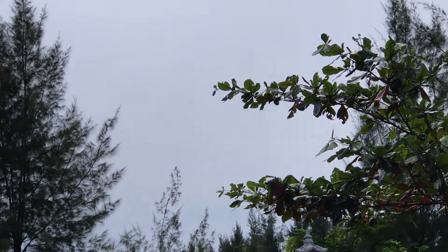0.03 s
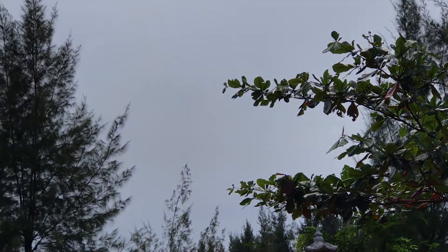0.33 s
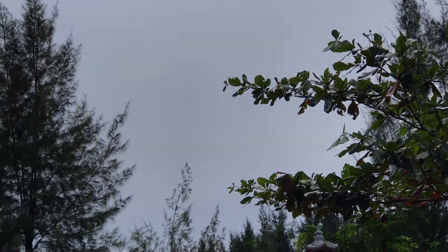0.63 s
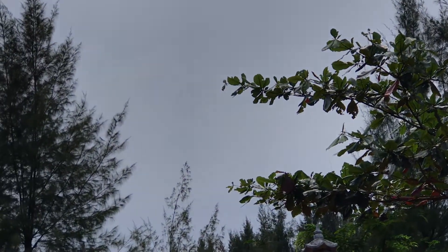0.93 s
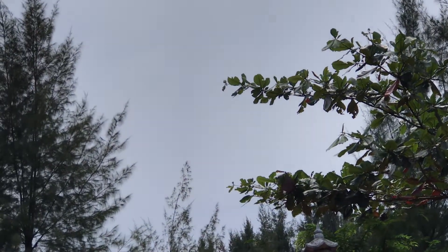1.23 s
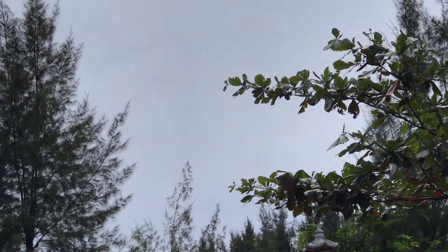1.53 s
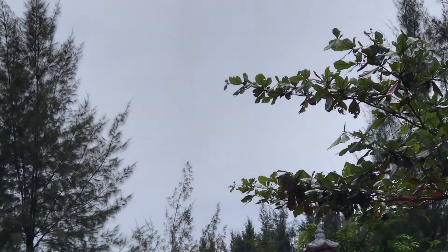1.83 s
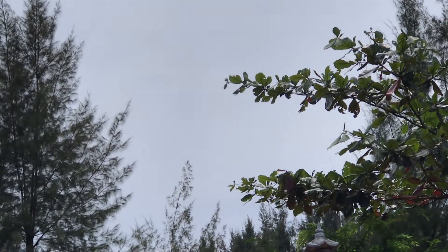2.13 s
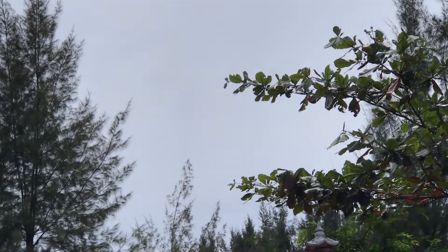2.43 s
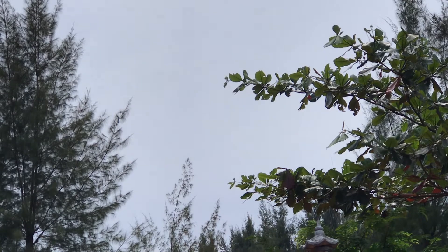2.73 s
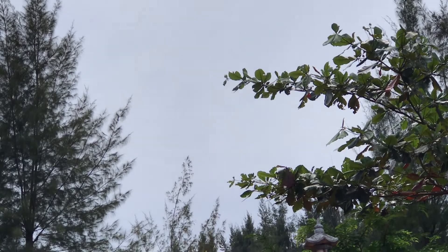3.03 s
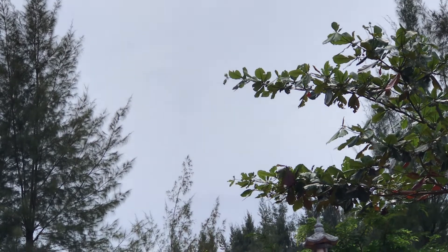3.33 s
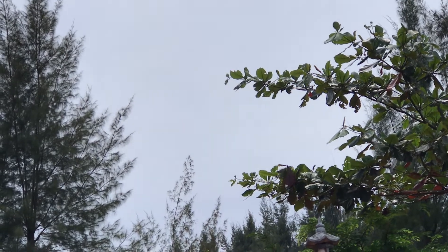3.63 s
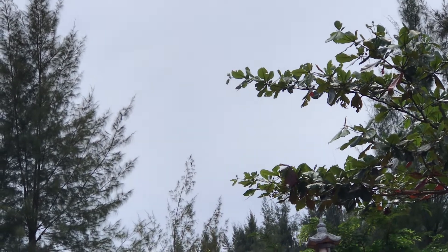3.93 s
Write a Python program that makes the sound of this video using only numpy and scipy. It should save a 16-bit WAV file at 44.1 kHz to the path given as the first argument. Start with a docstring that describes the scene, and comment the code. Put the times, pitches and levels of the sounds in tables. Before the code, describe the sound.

Short rising bird calls come in a few bursts outdoors, over low background noise.

```python
"""An unseen bird calls among trees, over a low distant rumble and a thin insect drone that last throughout.
First comes a rising whistle that ends in a flick, with quick scooped chirps and faint far-off birds.
A dry tick and a few rustles follow, then two more whistles, one harsh rasp near 2.8 s, a rustle and chirps;
far birds close the scene. Whistles and chirps are gliding tones with overtones; the rasp is hiss with
throat resonances. The trees scatter each call into a short tail."""
import sys
import numpy as np
from scipy import signal
from scipy.fft import rfft, irfft
from scipy.io import wavfile

SR = 44100
rng = np.random.default_rng(int(sys.argv[2]) if len(sys.argv) > 2 else 0)


def to_wav(s):
    """Save 16-bit WAV."""
    ch = np.atleast_2d(s).T  # columns
    pcm = np.round(np.clip(ch, -1, 1) * 32767)  # PCM
    wavfile.write(sys.argv[1], SR, pcm.astype(np.int16))


N = 176400
LEAD_S = .25  # tracks begin early, so the tail of an earlier call carries into the scene


def amp(db):
    """Amplitude ratio of a level in decibels."""
    return 10 ** (np.asarray(db) / 20)


def unit(x):
    """Normalisation to rms 1."""
    return x / np.sqrt(np.mean(x ** 2) + 1e-20)


def read(points, hz):
    """Interpolation of a table on a log-frequency axis."""
    f, value = np.transpose(points)
    return np.interp(np.log(hz + 1), np.log(f + 1), value)


def noise(size, shape):
    """Spectral shaping: white noise weighted by the gain shape(Hz), at rms 1."""
    spectrum = rfft(rng.standard_normal(size))
    return unit(irfft(spectrum * shape(np.fft.rfftfreq(size, 1 / SR)), size))


def band(size, hz, width):
    """Narrow-band noise with a Gaussian spectrum."""
    return noise(size, lambda f: np.exp(-.5 * ((f - hz) / width) ** 2))


def wander(size, rate_hz):
    """Low-pass noise: a smooth random modulator."""
    return noise(max(size, SR), lambda f: np.exp(-(f / rate_hz) ** 2))[:size]


def edges(t, length, edge_s):
    """Raised-cosine onset and release of a note."""
    return np.sin(np.pi / 2 * np.clip(np.minimum(t, length - t) / edge_s, 0, 1)) ** 2


def phase_of(hz):
    """Phase as the time integral of frequency."""
    return 2 * np.pi * np.cumsum(hz) / SR


def flutter(phase, radians):
    """Random phase modulation broadens a partial's spectral line."""
    return np.sin(phase + radians * wander(len(phase), 500))


def background():
    """Superposed noise: broadband rumble and air, narrow bands of distant machine hum and insects."""
    # spectrum of the rumble and air: (frequency [Hz], relative spectral level [dB])
    air_spectrum = [(12, -31), (24, -38), (40, -5), (77, -4), (130, -5), (190, -11), (300, -21), (500, -27),
                    (800, -28.5), (1700, -31.5), (2800, -36.5), (4200, -41.5), (5500, -43.5), (7730, -50),
                    (9500, -44), (16000, -51)]
    # steady bands of machines and of insects: (centre [Hz], width [Hz], level [dB])
    hums = [(73.1, 4.9, -55), (169.4, 7.5, -64), (354.3, 5.1, -74.5)]
    insects = [(6628, 240, -72), (9150, 420, -81), (13450, 150, -84), (15530, 120, -81)]
    air = noise(N, lambda f: amp(read(air_spectrum, f)))
    air *= amp(-51.5 + .88 * wander(N, rate_hz=2))  # slight gusts
    return air + sum(amp(db) * band(N, hz, width) for hz, width, db in hums + insects)


def whistles():
    """Harmonic glides: a soft climbing tone swells, then flicks upward as its overtones strengthen."""
    # notes: (start [s], length [s], peak level [dB], opening re peak [dB],
    # swell time [share of length], pitch [ratio], overtone boost [dB])
    notes = [(-.19, 0.11, -37, -8, 0.43, 1.056, 2), (.108, 0.11, -37, -11, 0.48, 1.026, 3),
             (1.585, .128, -37, -18, 0.52, .995, 0.5), (1.855, .118, -36, -18, 0.52, 1.02, 5.5)]
    # pitch contour: (time [share of length], frequency before the note's ratio [Hz])
    glide = [(0, 2775), (.14, 2950), (.3, 3230), (.58, 3366), (.72, 3545), (.84, 3917), (.91, 4076),
             (1, 4470)]
    # overtones: (harmonic [number], relative level in the flick [dB], before the flick [dB])
    overtones = [(2, -40.5, -48), (3, -19.5, -32.5), (4, -13, -29)]
    opening_db_per_s, swell_s = 68, .0024
    flick_at, flick_rise_s = .76, .0026  # share of the length where the voice hardens, and how fast
    for start, length, db, soft_db, swell_at, ratio, bright_db in notes:
        t = np.arange(0, length, 1 / SR)
        hz = ratio * np.interp(t / length, *np.transpose(glide))
        phase = phase_of(hz * (1 + .0087 * wander(len(t), 300)))
        flick = 1 / (1 + np.exp((flick_at * length - t) / flick_rise_s))
        upper = sum(amp(bright_db + before + (during - before) * flick) * flutter(round(k) * phase, 1)
                    for k, during, before in overtones)
        opening_db = soft_db + opening_db_per_s * (t - swell_at * length / 2)
        held_db = opening_db / (1 + np.exp((t - swell_at * length) / swell_s))  # goes to 0 at the swell
        voice = amp(held_db + 2 * (flick - 1)) * np.sin(phase) + amp(.93 * held_db) * upper
        yield start, np.sqrt(2) * amp(db) * edges(t, length, .0063) * voice


def far_calls():
    """Linear frequency sweeps: the faint pure tones of other birds far off."""
    # calls: (start [s], length [s], first pitch [Hz], last pitch [Hz], level [dB])
    calls = [(0.014, 0.038, 5700, 5150, -69), (.355, .045, 6000, 5100, -70),
             (3.966, 0.051, 1560, 2020, -58), (3.905, .06, 14900, 15400, -75)]
    for start, length, from_hz, to_hz, db in calls:
        t = np.arange(0, length, 1 / SR)
        phase = phase_of(from_hz + (to_hz - from_hz) * t / length)
        yield start, np.sqrt(2) * amp(db) * edges(t, length, .0081) * np.sin(phase)


def chirps():
    """Frequency modulation: the pitch drops, then sweeps up; random jitter makes it rough."""
    # notes: (start [s], length [s], first pitch [Hz], dip [Hz], last pitch [Hz], mid-note level [dB],
    # growth over the note [dB], roughness [0-1], second harmonic re fundamental [dB])
    notes = [(0.116, .035, 4220, 3250, 4560, -44.5, -2, 0.1, -29),
             (.152, .02, 3690, 2780, 3560, -48, 16, 0.3, -20),
             (.394, .037, 4230, 3200, 4630, -47.5, -11, 0, -40),
             (0.43, 0.015, 3330, 2843, 3780, -49.5, 17, 0.4, -34),
             (3.21, 0.039, 4200, 3300, 4475, -46, 9, 0.13, -18),
             (3.247, 0.0129, 4210, 2920, 3120, -51.5, -3, .9, -1.5),
             (3.254, .025, 3490, 3760, 4780, -44, 12, 0.06, -25)]
    dip_at, scoop_bend, jitter = .261, 1.45, .12
    for start, length, first_hz, dip_hz, last_hz, db, growth_db, rough, overtone_db in notes:
        t = np.arange(0, length, 1 / SR)
        progress = t / length
        fall = np.maximum(1 - progress / dip_at, 0) ** 2
        after_dip = np.maximum((progress - dip_at) / (1 - dip_at), 0)
        rise = np.sin(np.pi / 2 * after_dip ** scoop_bend) ** 2
        hz = dip_hz + (first_hz - dip_hz) * fall + (last_hz - dip_hz) * rise
        phase = phase_of(hz * (1 + jitter * rough * wander(len(t), 1650)))
        upper = flutter(2 * phase, 1.6) + amp(-8.5) * flutter(4 * phase, 1.9)
        envelope = np.sqrt(2) * amp(db + growth_db * (progress - .5)) * edges(t, length, .0022)
        yield start, envelope * (np.sin(phase) + amp(overtone_db) * upper)


def tick():
    """A transient: low-pass noise with a fast exponential decay makes one tiny dry tick."""
    start, decay_s = .486, .00059
    t = np.arange(256) / SR
    yield start, amp(-44) * np.exp(-t / decay_s) * noise(len(t), lambda f: 1 / (1 + (f / 4500) ** 2))


def rustles():
    """Random amplitude modulation gives faint puffs of band noise their grain."""
    # puffs: (peak time [s], half length [s], centre [Hz], width [octaves], level [dB])
    puffs = [(.872, 0.01, 2360, 0.36, -59), (0.875, .018, 4420, 0.25, -65),
             (0.982, .015, 2970, 0.56, -60.5), (1.204, 0.013, 3300, 0.52, -63),
             (1.367, 0.018, 2280, 0.21, -59), (1.369, 0.014, 3780, 0.23, -64.5),
             (3.156, 0.016, 4500, 0.17, -64)]
    t = np.arange(-.06, .06, 1 / SR)
    for peak_s, half_s, centre_hz, octaves, db in puffs:
        hiss = noise(len(t), lambda f: np.exp(-.5 * (np.log2((f + 1) / centre_hz) / octaves) ** 2))
        grainy = unit(hiss * amp(3 * wander(len(t), 300)))
        yield peak_s + t[0], amp(db) * np.exp(-.5 * (t / half_s) ** 2) * grainy


def rasp():
    """Formants: two throat resonances colour a harsh hiss; the upper grows as the lower fades."""
    # envelope of the call: (time [s], level [dB])
    envelope = [(2.8, -69), (2.814, -54), (2.826, -42), (2.86, -46), (2.878, -43), (2.908, -44),
                (2.918, -44), (2.94, -80)]
    # spectrum of the hiss: (frequency [Hz], relative spectral level [dB])
    colour = [(700, -40), (1300, -18), (1800, -11), (2600, -10), (3200, -5), (4400, -6), (6000, -6),
              (7500, -12.5), (11000, -17), (15500, -13.5)]
    # throat resonances: (centre [Hz], width [Hz], mid-call level re hiss [dB], growth re hiss [dB/s])
    throat = [(3900, 120, -7, -32), (5420, 240, -6.5, 77)]
    times, db = np.transpose(envelope)
    t = np.arange(times[0], times[-1], 1 / SR)
    hiss = noise(len(t), lambda f: amp(read(colour, f)))
    formants = sum(amp(ring_db + growth * (t - t.mean())) * band(len(t), hz, width)
                   for hz, width, ring_db, growth in throat)
    flicker = amp(.5 * wander(len(t), 200))
    yield times[0], unit((hiss + formants) * flicker) * amp(np.interp(t, times, db))


def trees(x, wet_db):
    """Reverberation: a few near reflections, then diffuse scatter from trunks and foliage."""
    # near reflections: (delay [s], gain [ratio])
    echoes = [(.0045, 0.14), (.0125, 0.31), (.019, 0.19), (.03, 0.18)]
    # main decay of the scatter: (frequency [Hz], time to fall 60 dB [s])
    decay_times = [(1500, 0.56), (4000, 0.69), (6000, 0.8), (11000, 0.76), (16000, 0.38)]
    near_db, near_t60_s, late_db, late_t60_s = -9.5, .24, -17.5, 1.8
    arrivals_per_s, build_up_s = 4000, .0044
    t = np.arange(SR) / SR
    arrivals = rng.choice([-1., 1.], SR) * (rng.random(SR) < arrivals_per_s / SR)
    hz, age, spectra = signal.stft(arrivals, SR, nperseg=256)
    main = amp(-60 * age / read(decay_times, hz)[:, None])
    late = amp(late_db - 60 * age / late_t60_s) / (1 + (hz[:, None] / 7000) ** 4)
    near = amp(near_db - 60 * age / near_t60_s)
    tail = signal.istft(spectra * (main + late + near), SR, nperseg=256)[1][:SR]
    tail *= np.minimum(t / build_up_s, 1)
    response = amp(wet_db) * tail / np.linalg.norm(tail)
    response[0] += 1  # direct sound
    for delay, gain in echoes:
        response[round(delay * SR)] += gain
    return signal.fftconvolve(x, response)[:len(x)]


def track(*events):
    """Superposition of (start [s], sound) events on a track that begins LEAD_S early."""
    mix = np.zeros(N + round(LEAD_S * SR))
    for start, sound in events:
        part = mix[max(round((start + LEAD_S) * SR), 0):][:len(sound)]
        part += sound[:len(part)]
    return mix


def scene():
    """Direct and scattered sound add, all events lowered by 3 dB, over the background."""
    glides = track(*whistles(), *far_calls())
    scoops = track(*chirps())
    noises = track(*rasp(), *tick(), *rustles())
    heard = trees(glides, wet_db=-4) + trees(scoops, wet_db=-4.5) + trees(noises, wet_db=-2.5)
    return (heard[-N:] * amp(-3) + background())[None]


def record(dry):
    """Band limiting: a steep linear-phase low-pass removes the highest treble."""
    cutoff_hz = 15740
    low_pass = signal.firwin(801, cutoff_hz, window=("kaiser", 8), fs=SR)
    return signal.oaconvolve(dry, low_pass[None], "same")


dry = scene()
out = record(dry)
to_wav(out)
```